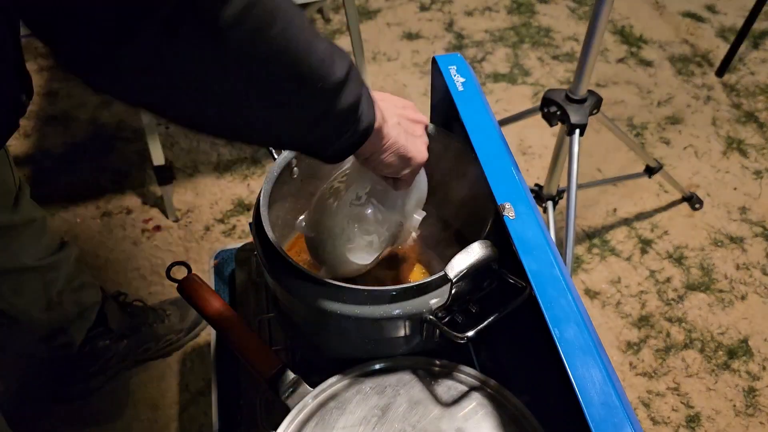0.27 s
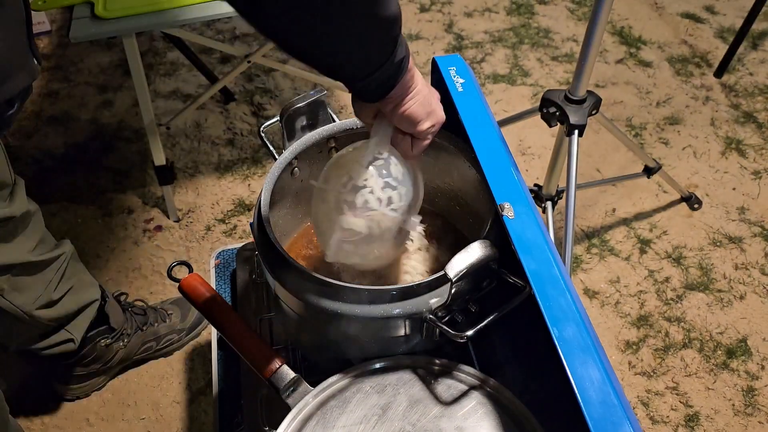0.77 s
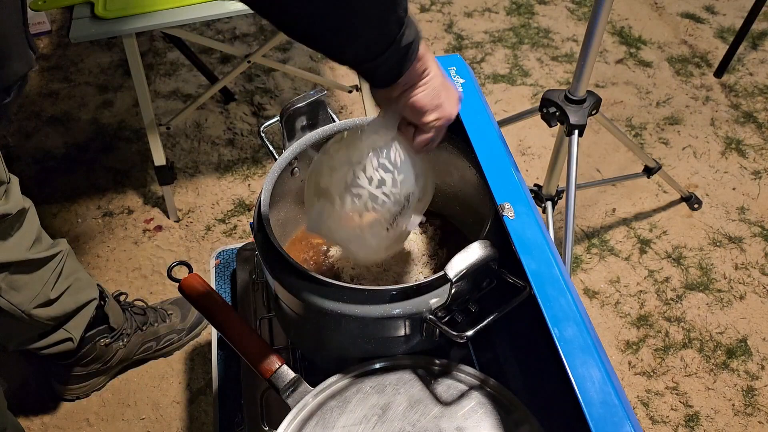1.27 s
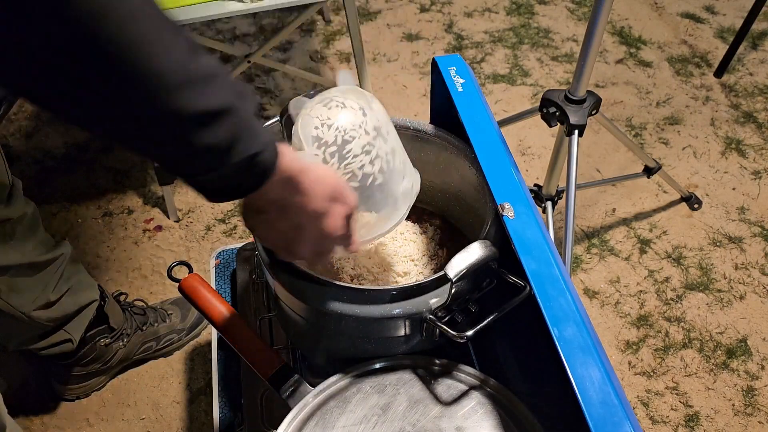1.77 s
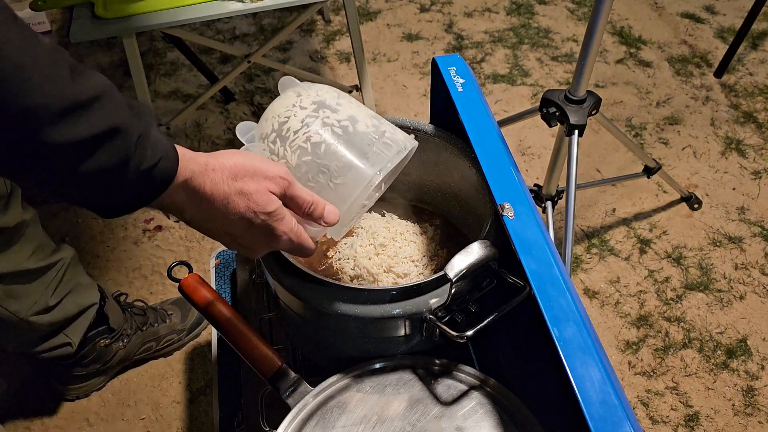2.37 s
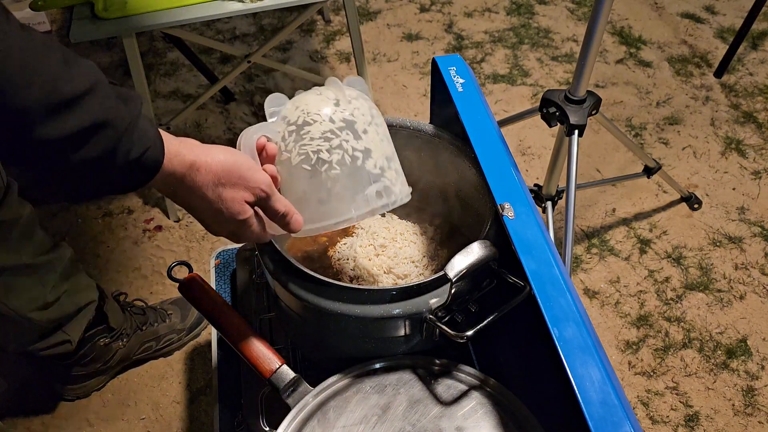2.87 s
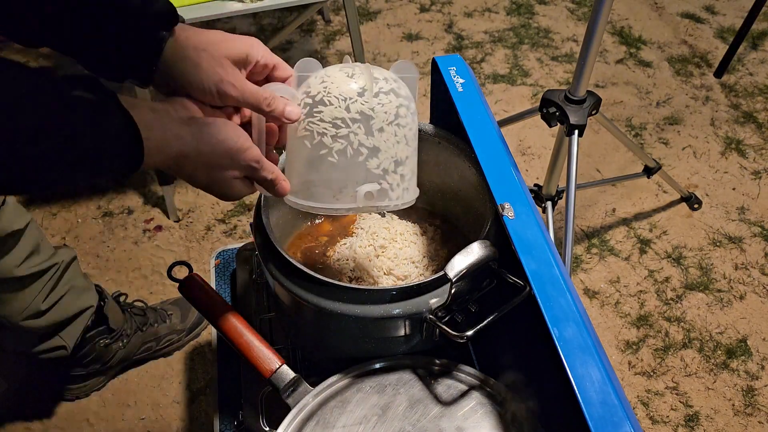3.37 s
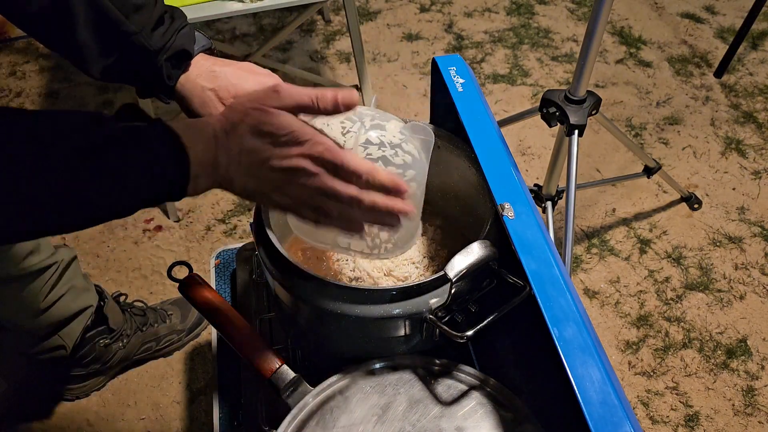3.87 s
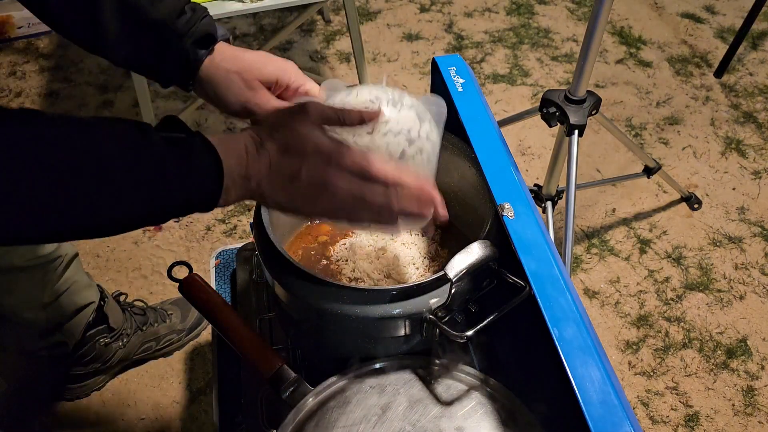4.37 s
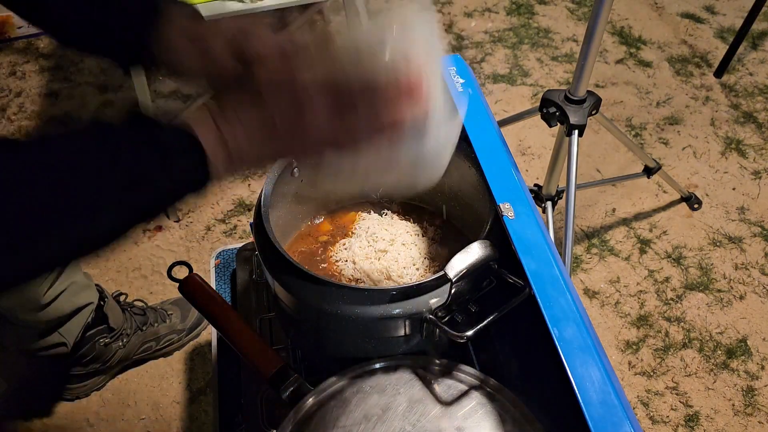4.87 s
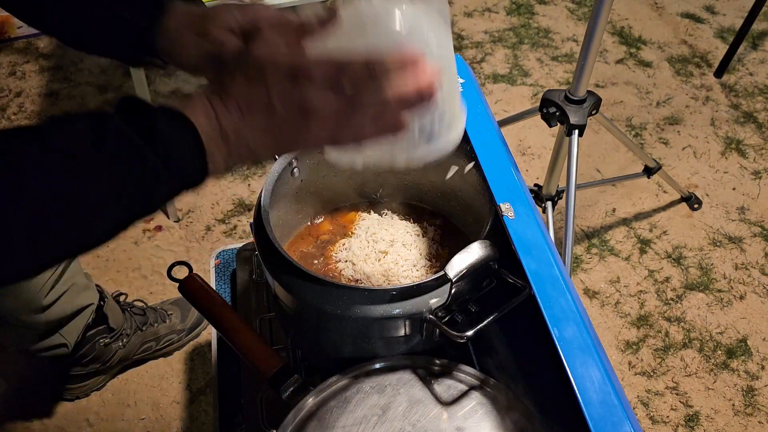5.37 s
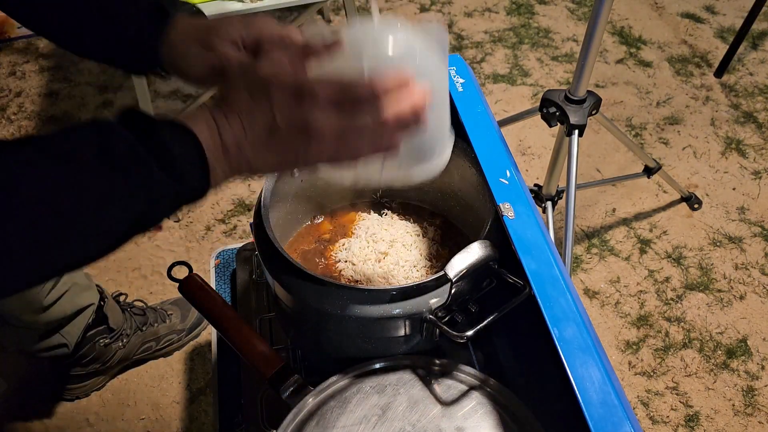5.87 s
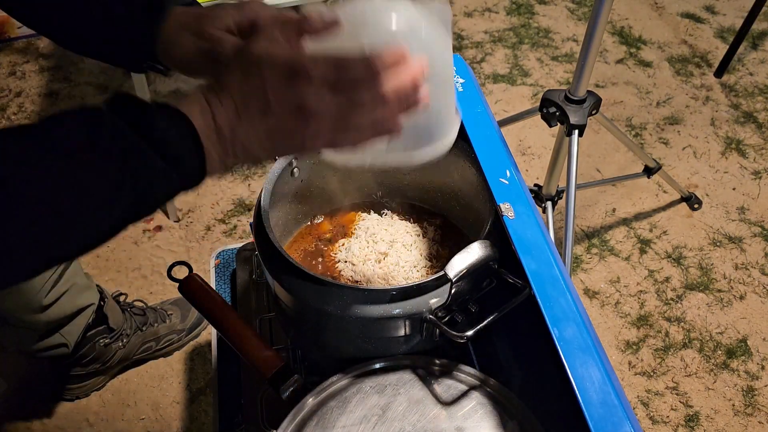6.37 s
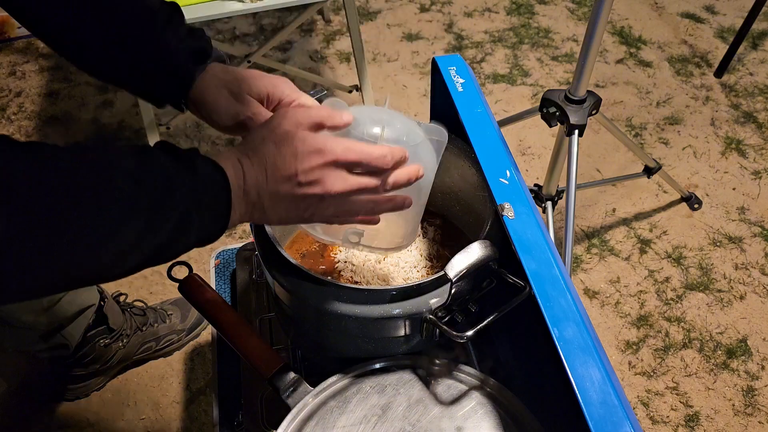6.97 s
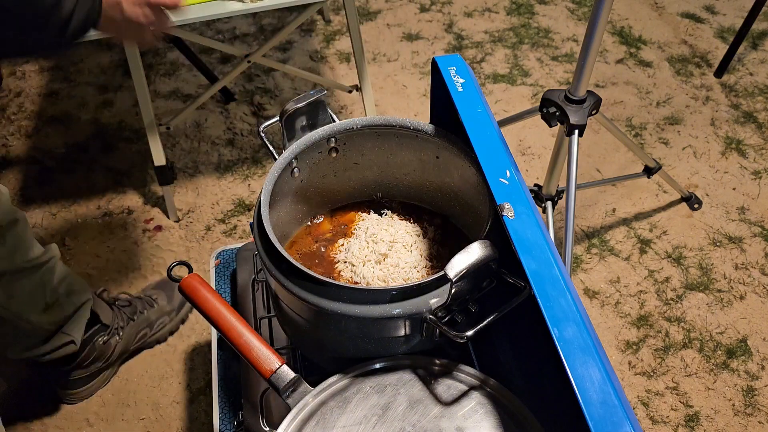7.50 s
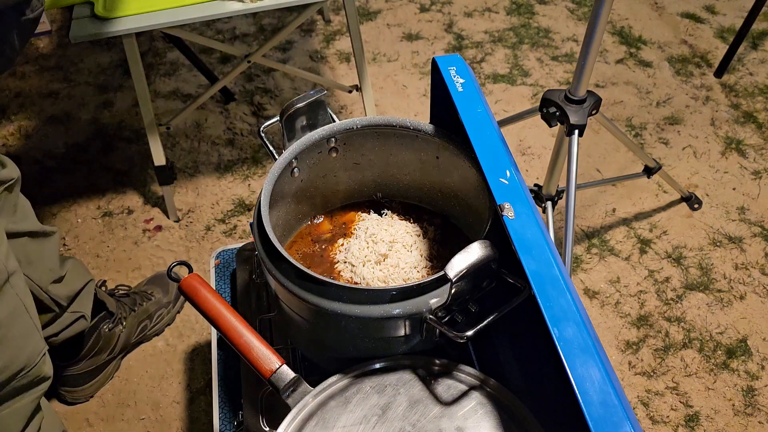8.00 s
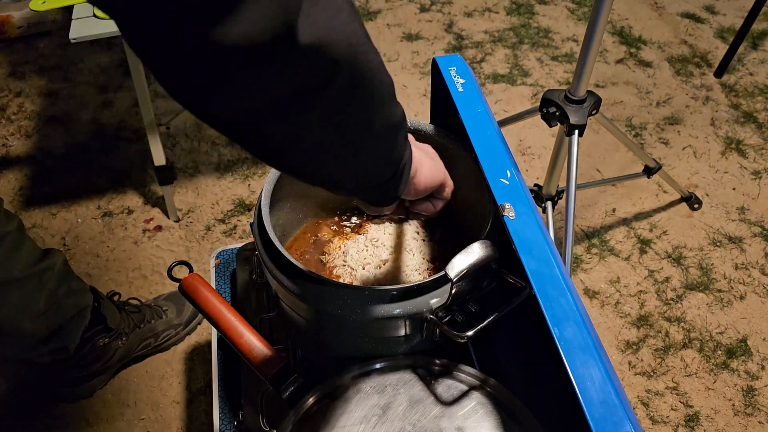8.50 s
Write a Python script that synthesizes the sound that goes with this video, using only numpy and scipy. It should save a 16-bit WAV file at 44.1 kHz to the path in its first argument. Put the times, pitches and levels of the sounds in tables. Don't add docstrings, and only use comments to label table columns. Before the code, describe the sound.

A plastic jug of wet rice bangs a steel pot rim, rattles, then four hard palm slaps thud over bubbling stew and soft burner hiss outdoors.

```python
import sys
import numpy as np
from scipy import signal
from scipy.fft import rfft, irfft
from scipy.io import wavfile
from scipy.ndimage import uniform_filter1d

SR = 44100
rng = np.random.default_rng(int(sys.argv[2]) if len(sys.argv) > 2 else 0)


def gain_from_decibels(decibels):
    exponent = np.asarray(decibels, float) / 20
    return 10 ** exponent


def output_pcm(signal):
    pcm = np.clip(np.atleast_2d(signal).T, -1, 1) * 32767
    wavfile.write(sys.argv[1], SR, np.round(pcm).astype(np.int16))


N = 385434


def evened(x):
    return x / np.sqrt(np.mean(x ** 2) + 1e-20)


def read(points, hz, axis=1):
    columns = np.transpose(points)
    return np.interp(np.log(hz + 1), np.log(columns[0] + 1), columns[axis])


def level(rows):
    s, db = np.transpose(rows)
    return gain_from_decibels(np.interp(np.arange(N) / SR, s, db, -200, -200))


def add(mix, s, sound):
    part = mix[round(s * SR):][:len(sound)]
    part += sound[:len(part)]


def band(x, lo_hz, hi_hz):
    return signal.sosfilt(signal.butter(2, [lo_hz, hi_hz], "band", fs=SR, output="sos"), x)


def colour(x, points):
    gain = gain_from_decibels(read(points, np.fft.rfftfreq(x.shape[-1], 1 / SR)))
    return irfft(rfft(x) * gain, x.shape[-1])


def causal(x, points):
    cepstrum = irfft(np.log(gain_from_decibels(read(points, np.fft.rfftfreq(8192, 1 / SR)))))
    cepstrum[1:4096] *= 2
    cepstrum[4097:] = 0
    response = irfft(np.exp(rfft(cepstrum)))[:4096]
    return signal.oaconvolve(x, response)[:N]


def grit(per_s, spread_db):
    size = gain_from_decibels(spread_db * np.minimum(rng.exponential(1, (2, N)), 4))
    size = size * rng.choice([-1, 1], (2, N))
    return evened(size * (rng.random((2, N)) < per_s / SR))


def through(x, response):
    return signal.oaconvolve(x, response[None], axes=1)[:, :N]


def ring(modes, length=.6):
    t = np.arange(round(length * SR)) / SR
    return -sum(gain_from_decibels(db - 60 * t / t60) * np.sin(2 * np.pi * hz * t) for hz, db, t60 in modes)


def strike(modes, db, crack_db, contact_ms, clatter_db=-22, clatter_t60=0.08, give=1 / 500,
           clatter_hz=(350, 1700), split=0):
    spot = rng.standard_normal((60, 2))
    if split:
        modes = modes + [(hz * (1 + split), db - 12, t60 * .7) for hz, db, t60 in modes]
    modes = [(hz * (1 + give * a), db + b, t60) for (hz, db, t60), (a, b) in zip(modes, spot)]
    push = np.hanning(int(max(contact_ms, .1) * SR / 1000) + 3)
    body = np.convolve(ring(modes), push)[:26000]
    body = signal.sosfilt(signal.butter(2, 55, "high", fs=SR, output="sos"), body)
    t, noise = np.arange(26000) / SR, rng.standard_normal(26000)
    crack = band(noise, 1500, 6150) + gain_from_decibels(-4.5) * band(noise, 2010, 15120)
    crack *= (gain_from_decibels(15 - 60 * t / 0.0053) + gain_from_decibels(-3.5 - 60 * t / 0.009) + gain_from_decibels(-12 - 60 * t / 0.12)) / 2
    crack *= 1 - np.exp(-t * 1000 / .6)
    clatter = evened(band(noise, *clatter_hz)) * gain_from_decibels(clatter_db - 60 * t / clatter_t60)
    clatter *= 1 - np.exp(-t * 1500)
    return gain_from_decibels(db) * (body / abs(body).max() + gain_from_decibels(crack_db) * crack + clatter)


# f/Hz, level/dB, t60/s
JUG_MODES = [(94.1, -10.5, 0.026), (227, -46, 0.05), (300, 9.5, 0.05), (270, -29, 0.63),
             (427, -20.5, 0.023), (489, 5, 0.03), (658, -8.5, 0.11), (795, -4, 0.045), (430, -2.5, 0.0093),
             (1774, 4, 0.08), (2170, -19, .08), (2760, 19, 0.056)]
PALM_MUFFLE_DB = -10
_hz, _db, _t60 = JUG_MODES[7]
PALMED_JUG = JUG_MODES[:7] + [(_hz, _db + PALM_MUFFLE_DB, _t60)] + JUG_MODES[8:]


def jug_thud(out, modes, s, db, crack_db, contact_ms):
    add(out, s, strike(modes, db, crack_db, contact_ms, give=0.0039,
                       clatter_db=-17 - 3.5 * contact_ms, clatter_hz=(380, 750)))


# f/Hz, level/dB, t60/s
POT_MODES = [(260, -11, .85), (285, -12, 1.2), (302, -12, .65), (450, -8, .08), (517, -10, .5),
             (598, -3, .22), (673, -5, .45), (915, -11, .55), (1001, -14, .38), (1061, -8, .5),
             (1350, -19, .3), (1520, -16, .3), (1604, -16, .48), (1760, -9, .12), (1830, -2, .12),
             (2000, -11, .16), (2105, -4, .12), (2170, -10, .14), (2460, -12, .12), (2724, -20, .3),
             (3063, -22, .4), (390, -15, .4), (800, -17, .3), (1190, -17, .34), (1430, -20, .3)]
# f/Hz, level/dB, t60/s
WALL_MODES = [(798, 1, 0.08), (1123, -6.5, 0.012), (1434, 2, 0.024), (1600, -7, 0.058), (1820, 4, 0.058),
              (2510, -14, 0.16), (3070, 8, 0.022), (3750, -30, 0.022), (4240, -19, .05), (2900, 14, 0.014),
              (4800, 4, .03), (6020, 0, 0.013)]
# t/s, peak level/dB, crack level/dB re peak, contact/ms, finger snap level/dB re peak
SLAPS = [
    (3.857, -7, -14, 2.85, -9),
    (4.0364, -2.5, -6.5, 1.87, -15),
    (4.1987, -5, -7, 1.2, -9.5),
    (4.3636, -1, -7.5, 1, -13),
]
PALM_LEAD = .3
LEAD_IN_S, LEAD_IN_DB = 0.0046, -23.5


def slaps(out):
    for s, db, crack_db, contact_ms, snap_db in SLAPS:
        jug_thud(out, PALMED_JUG, s - contact_ms * PALM_LEAD / 1000, db, -60, contact_ms)
        jug_thud(out, PALMED_JUG[:7], s - LEAD_IN_S, db + LEAD_IN_DB, -60, 3)
        add(out, s, strike(WALL_MODES, db + snap_db, crack_db - snap_db, 0.13, give=0.007))
        add(out, s, strike(POT_MODES[:7], db - 33, -40, contact_ms + .6, split=.04,
                           clatter_db=-10, clatter_t60=.2))


# t/s, ring level/dB, crack level/dB re ring, contact/ms, jug thud level/dB re ring
BANGS = [
    (0.4518, -13.5, -9, 0.3, 6.5),
    (0.4546, -32, 14, 1, 18),
    (0.4578, -37, 23, 0.75, 25),
    (.613, -36.5, -10, 0.72, -18),
]
RIM_LIFT_DB = 6
RIM_DAMPING = 0.8


def bangs(out):
    jug_thud(out, PALMED_JUG[:7], BANGS[0][0] - LEAD_IN_S, BANGS[0][1] - 14, -60, 3)
    lift_above_hz = JUG_MODES[3][0]
    lip = [(hz, db + RIM_LIFT_DB * (hz > lift_above_hz), t60 * RIM_DAMPING) for hz, db, t60 in PALMED_JUG[:10]]
    for s, db, crack_db, contact_ms, thud_db in BANGS:
        add(out, s, strike(POT_MODES, db, crack_db, contact_ms, clatter_db=-27, clatter_t60=.4,
                           clatter_hz=(320, 1500), split=.02))
        add(out, s, strike(lip, db + thud_db, -58, contact_ms, clatter_db=-11, clatter_hz=(400, 800)))


# t/s, peak level/dB, contact/ms
TAPS = [(0.39, -38, 2.1), (1.178, -43, 2.8), (1.425, -46, 0.64), (1.874, -39, 0.72), (2.399, -46, 0.59),
        (2.478, -41, 0.85), (2.7155, -35, 1.8), (2.812, -44, 2), (2.994, -39.5, 0.61), (3.168, -36.5, 0.84),
        (3.695, -38.5, 3.9), (4.68, -41, 3.7), (4.837, -39, 2.4), (5.234, -36.5, 0.85), (5.444, -38, 2.3),
        (5.477, -32.5, 2.9), (5.905, -39, 0.74), (5.965, -41, 1.05), (5.997, -36, 2.7), (6.429, -46, 0.86),
        (6.475, -37, 0.87), (6.814, -43, 3.2), (7.044, -34, 0.77), (7.0507, -31, 1), (7.123, -42.5, 1.5),
        (7.1609, -29, 2.7), (7.204, -36, 1.3), (7.23, -43.5, 1.8), (7.664, -46, 0.5)]


def taps(out):
    for s, db, contact_ms in TAPS:
        jug_thud(out, JUG_MODES, s, db, -19, contact_ms)


# f/Hz, level/dB, t60/s
LATCH_MODES = [(228, -4, .17), (262, -12, .4), (420, -15, .15), (800, -15, .15), (641, -11, .11),
               (1125, 3, .36), (1185, -12, .12), (1857, -14, .15), (2509, -22, .15), (3074, -20, .1),
               (4172, -16, .04)]
# t/s, peak level/dB, crack level/dB re peak, contact/ms, time until a hand damps it/s
CLACKS = [
    (2.549, -42, 8.5, 0.13, 0.029),
    (2.651, -46, -3, .5, .02),
    (2.66, -30, -1, 0.5, 0.03),
    (2.7045, -44, 0, .5, .02),
    (2.72, -33, -8, 1, 0.031),
    (2.777, -39, -2, 0.3, 0.035),
    (2.815, -46, 0, 0.5, 0.02),
    (2.876, -50, -5, 0.34, 0.012),
    (8.1, -18, -5, 0.32, 0.042),
]
CLATTER_DB, LOOSER_PER_DB = -14.5, 0.308
BUZZ_DB, BUZZ_T60 = -23, .35


def clacks(out):
    hardest_db = CLACKS[-1][1]
    for s, db, crack_db, contact_ms, held in CLACKS:
        clatter_db = CLATTER_DB + LOOSER_PER_DB * (hardest_db - db)
        clack = strike(LATCH_MODES, db, crack_db, contact_ms, clatter_db=clatter_db, clatter_t60=0.21,
                       give=1 / 300, clatter_hz=(330, 2600), split=0.037)
        t = np.arange(len(clack)) / SR
        buzz = band(rng.standard_normal(len(clack)), 3000, 15500)
        clack = clack + buzz * gain_from_decibels(db + BUZZ_DB - 60 * t / BUZZ_T60)
        add(out, s, clack * np.clip((held - t) / .002, 0, 1))


# f/Hz, level/dB, t60/s
SPOON_MODES = [(915, -19, .35), (1001, -21, .3), (1190, -22, .2), (1556, -19, .3), (1599, -17, .32),
               (1800, 2, .045), (1900, -2, .04), (2046, -16, .2), (2175, -9, .1), (2428, -10, .08),
               (2690, -14, .15), (3047, -13, .14), (3429, -18, .12)]
# t/s, peak level/dB, crack level/dB re peak, contact/ms
CLINKS = [
    (8.159, -45, 0, .3),
    (8.1775, -22, -11, .15),
    (8.1795, -19, -19, .2),
    (8.1828, -20, -19, .2),
]


def clinks(out):
    for s, db, crack_db, contact_ms in CLINKS:
        clink = strike(SPOON_MODES, db, crack_db, contact_ms, clatter_db=-22, clatter_t60=.12,
                       give=.003, clatter_hz=(1300, 3200), split=.03)
        add(out, s, band(clink, 700, 15000))


# f/Hz, level/dB
CARRY = [(40, -10.5), (85, -2.5), (150, -17.5), (215, 1.5), (600, 4.5), (1000, 2.5), (1500, 3)]


def knocks():
    out = np.zeros(N)
    for source in (slaps, bangs, taps, clacks, clinks):
        source(out)
    return causal(out, CARRY)


# t/s, peak level/dB, dull patter level/dB re peak, t60/s, fine hiss level/dB re peak
SHAKES = [(0.1406, -47.5, -12, 0.49, -4), (0.263, -48, -14, 0.38, 1.5), (1.062, -45, -11, 0.05, -5),
          (1.0869, -46, -12, 0.071, 4), (1.1058, -35, -15.5, 0.11, 3.5), (1.244, -34, -18.5, 0.11, -1.5),
          (1.256, -34.5, -24, 0.077, -2), (1.284, -34, -25, 0.052, 1), (1.3, -38, -15, 0.054, -14),
          (1.367, -45.5, -3, 0.043, -1), (1.395, -49, -18, 0.049, 7), (1.4167, -46.5, -20, 0.068, 3.5),
          (2.719, -44, -11, 0.073, 4), (3.48, -53, 8, 0.024, 15), (3.9025, -38.5, -13, 0.12, -3),
          (4.093, -45.5, -16.5, 0.16, -2), (4.131, -44, -12.5, 0.089, 8), (4.165, -31.5, -14.5, 0.21, 0),
          (4.312, -43, -8, 0.22, 5), (4.4876, -43.5, -16, 0.086, -3), (4.901, -36.5, -15, 0.13, -5),
          (4.925, -39, -10.5, 0.13, -2.5), (5.02, -57, -5, 0.2, 6), (5.4494, -47, -14, 0.15, -2),
          (5.481, -42, -10, 0.21, 3.5), (5.9484, -61, 1.5, 0.37, 10), (5.9908, -33.5, -13, 0.14, 5.5),
          (6.495, -37.5, -14.5, 0.079, -4.5), (6.8523, -41, -9.5, 0.073, -6.5),
          (7.042, -39.5, -4, 0.23, -2), (7.2484, -39.5, -14, 0.074, 3.5), (8.497, -47, -10, 0.3, -3.5)]
# f/Hz, level/dB per Hz
RICE_COLOUR = [(1760, -47), (3000, -3.5), (5160, -1), (6120, -6.5), (6810, -6.5), (10300, -4.5),
               (14200, -4.5), (16000, -15.5), (16500, -60)]
# t/s, level/dB
TRICKLE = [(0.0, -77), (0.34, -67.5), (0.85, -70), (1.0, -79.5), (2.6, -80), (2.92, -74.5), (3.7, -73),
           (4.4, -64.5), (4.55, -83.5), (4.99, -63.5), (5.15, -92), (5.4, -70), (6.1, -80.5), (6.8, -75),
           (7.74, -73.5), (8.32, -73), (8.74, -73)]
# f/Hz, level/dB, t60/s
SHELL_MODES = [(1600, 17, 0.021), (2183, 13.5, 0.011), (3260, 3.5, 0.048), (4500, 8.5, 0.016),
               (5140, -28, 0.0079), (7160, 12, 0.0043), (8470, -29, 0.0073)]
SHAKE_RISE_MS = 4
STRAGGLE_DB, STRAGGLE_T60 = -23, 0.77
GRAIN_RING_DB = 0


def rice():
    bright, dull = level(TRICKLE) ** 2 * gain_from_decibels(24), np.zeros(N)
    fine = bright.copy()
    t = np.arange(SR // 2) / SR
    lead = np.arange(-SR // 20, 0) / SR
    for s, db, dull_db, t60, fine_db in SHAKES:
        burst = gain_from_decibels(2 * (db + 2.5 - 60 * t / t60)) * (1 - np.exp(-t * 1000 / SHAKE_RISE_MS)) ** 2
        stragglers = gain_from_decibels(2 * (db + STRAGGLE_DB - 60 * t / STRAGGLE_T60))
        add(bright, s, burst + stragglers)
        add(bright, s - 1 / 20, gain_from_decibels(2 * (db - 19.5 + 60 * lead / 0.57)))
        add(fine, s, burst * gain_from_decibels(2 * fine_db) + stragglers)
        add(dull, s, burst * gain_from_decibels(2 * dull_db))
    wall = evened(through(grit(1800, 4.5), ring(SHELL_MODES, 0.038)))
    ticks = evened(colour(grit(3500, 3.8), RICE_COLOUR)) + gain_from_decibels(6.5) * band(wall, 3150, 7000)
    ticks = evened(ticks)
    patter = evened(band(grit(2400, 6), 1600, 3100)) + gain_from_decibels(11) * band(wall, 920, 2600)
    falls = grit(1100, 1.6) * np.sqrt(dull)
    rung = through(falls, ring(POT_MODES[10:], 0.15)) / np.linalg.norm(ring(POT_MODES[10:], .3))
    body = band(ticks, 540, 8200)
    out = body * np.sqrt(bright) + (ticks - body) * np.sqrt(fine)
    return out + evened(patter) * np.sqrt(dull) + gain_from_decibels(GRAIN_RING_DB) * rung


# t/s, peak level/dB, f/Hz
GRAINS = [(0.14, -47, 4850), (0.164, -40.5, 4280), (0.2568, -43, 3080), (0.268, -42, 6160),
          (0.8175, -41, 4540), (1.031, -44, 5440), (1.062, -43, 3400), (1.0869, -49, 3460),
          (1.1, -39, 5000), (1.111, -27, 5100), (1.1644, -44, 2730), (1.1994, -45, 3210),
          (1.2194, -41, 4260), (1.237, -53, 3920), (1.2446, -36, 3600), (1.286, -35, 8760),
          (1.3044, -38, 3250), (1.368, -38, 4270), (1.3976, -39, 5690), (1.4167, -50, 3260),
          (2.2004, -49, 3970), (2.2922, -57, 2780), (2.6344, -44, 5590), (2.652, -39, 2890),
          (2.7043, -52, 2510), (2.7212, -50, 2520), (2.814, -53, 2570), (3.6206, -37, 9550),
          (3.7266, -57, 2290), (3.9083, -38, 2870), (4.0946, -41.5, 4380), (4.133, -30, 5100),
          (4.1704, -24, 6600), (4.2857, -45, 2000), (4.287, -33.5, 4740), (4.3126, -34.5, 9590),
          (4.4508, -61, 2730), (4.488, -40, 5270), (4.593, -45, 3660), (4.903, -34, 3070),
          (4.9294, -43, 5570), (4.9494, -38, 4720), (5.123, -50, 2380), (5.4834, -28, 6060),
          (5.8192, -46, 2910), (5.9484, -55, 2060), (5.9938, -25, 5160), (6.1674, -51, 2880),
          (6.497, -52, 3400), (6.649, -46, 4620), (6.782, -39.5, 7060), (6.856, -48, 5180),
          (7.0459, -38, 4830), (7.2489, -32, 7900), (7.3437, -37.5, 4540), (8.4995, -41, 2150)]
GRAIN_DB, GRAIN_CYCLES, GRAIN_CEILING_DB = -7.5, 130, -27


def grains():
    out, t = np.zeros((2, N)), np.arange(1500) / SR
    for s, db, hz in GRAINS:
        fuzz = evened(band(rng.standard_normal((2, 1500)), hz * 0.82, hz * 1.44))
        tick = fuzz * gain_from_decibels(min(db, GRAIN_CEILING_DB) + GRAIN_DB - 60 * t * hz / GRAIN_CYCLES)
        for side in (0, 1):
            add(out[side], s, tick[side])
    return out


# t/s, hold/s, level/dB, rasp level/dB re level, t60/s
SCRAPES = [(0.45, .001, -22.5, -6, 0.098), (0.513, 0.1, -42, -23, 0.38), (0.593, 0.0044, -41.5, -9, 0.27),
           (2.646, 0.069, -40.5, -13, 0.11), (2.767, 0.0043, -37.5, -13, 0.33),
           (7.028, 0.03, -29, -17, 0.2), (7.118, 0.088, -36.5, -15.5, 0.36),
           (8.184, 0.0022, -58, 15, 0.067), (8.2, 0.013, -43.5, -9, 2.8), (8.479, 0.0045, -63, 15, 0.6),
           (8.538, 0.086, -54.5, 4, 0.55)]
SCRAPE_RISE_S = 0.024


def scrape():
    slips = grit(2200, 3)
    hollow = evened(through(slips, ring(JUG_MODES[:7], 0.088)))
    low = evened(hollow + evened(band(slips, 190, 1330)))
    high = evened(band(slips, 610, 4100))
    low_power, high_power, t = np.zeros(N), np.zeros(N), np.arange(SR) / SR
    for s, hold, db, rasp_db, t60 in SCRAPES:
        release = np.maximum(t - SCRAPE_RISE_S - hold, 0)
        drag = (np.minimum(t / SCRAPE_RISE_S, 1) * gain_from_decibels(db - 60 * release / t60)) ** 2
        add(low_power, s, drag)
        add(high_power, s, drag * gain_from_decibels(2 * rasp_db))
    return low * np.sqrt(low_power) * gain_from_decibels(-6.5) + high * np.sqrt(high_power) * gain_from_decibels(-4)


# t/s, peak level/dB, f/Hz
POPS = [(0.841, -48, 2060), (1.032, -39, 5060), (1.108, -40, 1600), (1.11, -38, 3300), (1.247, -43.5, 1660),
        (1.25, -38, 3300), (1.4647, -39, 1610), (2.0474, -42.5, 4500), (2.197, -35.5, 4070),
        (2.293, -39, 3000), (2.386, -44.5, 2200), (2.621, -48, 2850), (2.663, -32, 2850),
        (2.726, -49, 2550), (2.779, -42, 2550), (2.814, -36, 4600), (2.816, -51, 2570),
        (2.9373, -40.5, 2200), (3.098, -47, 1230), (3.172, -41, 3060), (3.535, -40.5, 2600),
        (3.683, -47.5, 1970), (3.7254, -41.5, 2240), (3.78, -40, 1570), (4.623, -43.5, 1940),
        (4.971, -39, 2000), (4.987, -37.5, 1400), (5.031, -62, 1320), (5.122, -37, 2130),
        (5.6438, -39, 2080), (5.755, -44, 5400), (5.8174, -51, 2930), (6.1692, -42.5, 2640),
        (6.387, -42.5, 1400), (6.6894, -43.5, 2330), (7.379, -39, 1600), (7.423, -43, 1920),
        (7.6594, -37.5, 1750), (7.9668, -37.5, 2170), (8.418, -39, 1980), (8.416, -33.5, 6300),
        (8.5, -45, 2100)]
# t/s, level/dB
SIMMER = [(0.0, -52), (0.34, -30), (0.85, -64), (1.58, -37), (1.9, -107), (2.48, -56), (2.72, -26),
          (2.9, -40), (3.5, -51), (3.75, -34), (4.3, -40), (4.45, -55), (5.1, -42.5), (5.65, -45),
          (5.94, -42), (6.4, -44), (7.38, -35.5), (8.74, -57)]
POP_CYCLES = 410


def stew():
    out, t = np.zeros((2, N)), np.arange(3000) / SR
    for hz in np.geomspace(900, 4500, num=14):
        bubble = np.sin(2 * np.pi * hz * t * (1 + 3.7 * t))
        bubble *= gain_from_decibels(-60 * t * hz / 40) * (1 - np.exp(-t * 900))
        out += through(grit(25, 2.3), bubble) * hz ** -.4
    out = evened(out) * level(SIMMER) * gain_from_decibels(-30.5)
    for s, db, hz in POPS:
        fuzz = evened(band(rng.standard_normal((2, 3000)), hz * 0.84, hz * 1.19))
        pop = fuzz * gain_from_decibels(db - 13.5 - 60 * t * hz / POP_CYCLES) * (1 - np.exp(-t * 700))
        for side in (0, 1):
            add(out[side], s, pop[side])
    return out


def echoes(x):
    t = np.arange(5000) / SR
    tail = rng.standard_normal((3, 5000)) * gain_from_decibels(-60 * t / .045) * (t > .001)
    phase = np.arange(N) / SR * 9 + np.arange(3)[:, None] * np.pi / 3
    turn = np.cos(phase) * np.sqrt(2 / 3)
    return signal.oaconvolve(x * turn, tail / np.linalg.norm(tail[0]), axes=1)[:, :N].sum(0)


# f/Hz, level/dB per Hz
AIR_COLOUR = [(12, 3.5), (20, -0.5), (62, -1.5), (156, -4.5), (206, -22.5), (265, -6), (428, -30),
              (506, -17.5), (1210, -29), (2970, -27.5), (3940, -41), (5360, -31.5), (5830, -32.5),
              (9000, -35), (15700, -38), (16300, -58.5)]
AIR_DB = -50
# f/Hz, width/Hz, level/dB
WHISTLES = [
    (1810, 60, -79),
    (5500, 250, -78),
    (6300, 120, -80),
]
# t/s, level/dB
RUMBLE = [(0.0, -77), (0.14, -47), (0.7, -47.5), (0.87, -44.5), (1.15, -41.5), (1.56, -43), (1.95, -53),
          (2.51, -45.5), (3.19, -47), (3.92, -38.5), (4.3, -43), (5.5, -68), (6.4, -42), (6.86, -50),
          (7.38, -49), (7.55, -84), (8.74, -57)]


def air():
    frames, bins = N // 256 + 5, np.fft.rfftfreq(1024, 1 / SR)
    a, b, patches = rng.standard_normal((3, 2, 513, frames))
    small = evened(uniform_filter1d(uniform_filter1d(patches[0], 6, 0), 8, 1))
    large = evened(uniform_filter1d(uniform_filter1d(patches[1], 40, 0), 12, 1))
    spectra = (a + 1j * b) * gain_from_decibels(read(AIR_COLOUR, bins)[:, None] + 2.6 * small + 1.9 * large)
    hiss = signal.istft(spectra, nperseg=1024, noverlap=768)[1][:, :N]
    out = gain_from_decibels(AIR_DB) * evened(hiss)
    flicker = evened(uniform_filter1d(rng.standard_normal(N), 3000))
    puffs = grit(2800, 1.6) * gain_from_decibels(4.8 * flicker)
    for hz, width, db in WHISTLES:
        out += gain_from_decibels(db) * evened(band(puffs, hz - width / 2, hz + width / 2))
    boom = evened(band(rng.standard_normal((2, N)), 34, 58.4))
    return out + boom * level(RUMBLE) * gain_from_decibels(-5)


# multiple of the base, level/dB
ENGINE_ORDERS = [(2, -52.5), (3, -90), (4, -95), (5, -67.5), (6, -59), (7, -65), (8, -82), (9, -88)]
ENGINE_HZ = 24.35


def engine():
    drift = evened(uniform_filter1d(uniform_filter1d(rng.standard_normal((9, N)), 6000), 6000))
    turns = np.cumsum(ENGINE_HZ * (1 + 0.007 * drift[-1])) / SR
    out = np.zeros(N)
    for (k, db), swell in zip(ENGINE_ORDERS, drift):
        out += gain_from_decibels(db + 2.3 * swell) * np.sin(2 * np.pi * (k * turns + rng.random()))
    return out


# f/Hz, likeness, lag/rad, level drop/dB
PORTS = [(60, .985, 0, .6), (500, .975, .15, 1.8), (1100, .92, .75, 2.5), (3000, .6, 0, 2.5),
         (3600, .6, 6, 4), (5500, .6, 12.5, 4), (7300, .6, 11, 3.5), (10300, .6, 22, 4), (15000, .5, 20, 9)]


def ports(near, other):
    hz = np.fft.rfftfreq(N, 1 / SR)
    same = np.clip(read(PORTS, hz), 0, 1)
    late = np.exp(-1j * read(PORTS, hz, axis=2))
    right = same * rfft(near) * late + np.sqrt(1 - same ** 2) * rfft(other)
    tilt = gain_from_decibels(read(PORTS, hz, axis=3) / 2)
    return np.array([irfft(rfft(near) * tilt, N), irfft(right / tilt, N)])


ECHO_DB, ECHO_HZ = 0, 1700


def scene():
    hits = knocks()
    back = band(echoes(hits), ECHO_HZ, 21000)
    near, other = air() + rice() + grains() + stew() + scrape()
    return ports(near + hits + engine(), other + gain_from_decibels(ECHO_DB) * back)


# f/Hz, level/dB
BAND_EDGES = [(15, -14), (34, 0), (15800, 0), (16100, -24), (16800, -28), (17000, -80)]


def band_limit(x):
    return signal.sosfilt(signal.butter(12, 16800, fs=SR, output="sos"), x)


def record(dry):
    limited = np.clip(1.12 * np.tanh(dry / 1.2), -.9, .9)
    return band_limit(colour(limited, BAND_EDGES))


dry = scene()
out = record(dry)
output_pcm(out)
```